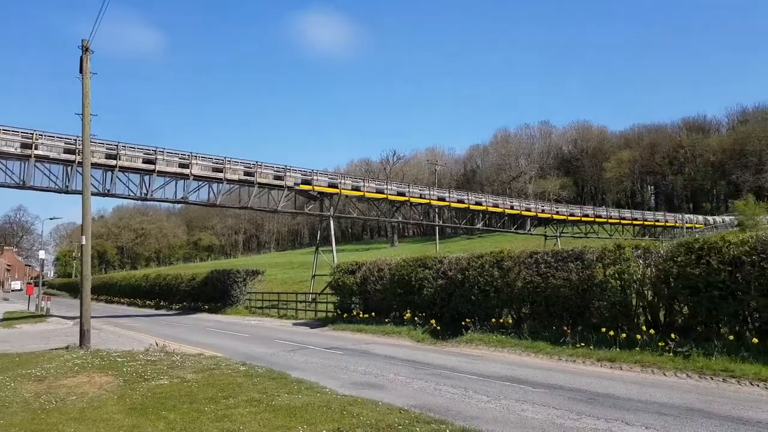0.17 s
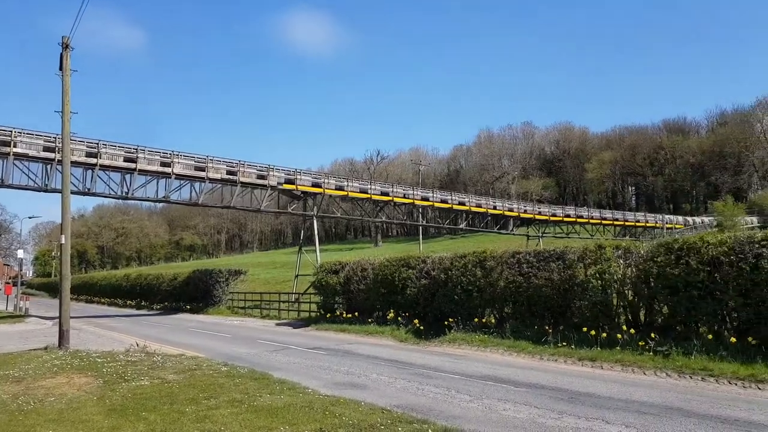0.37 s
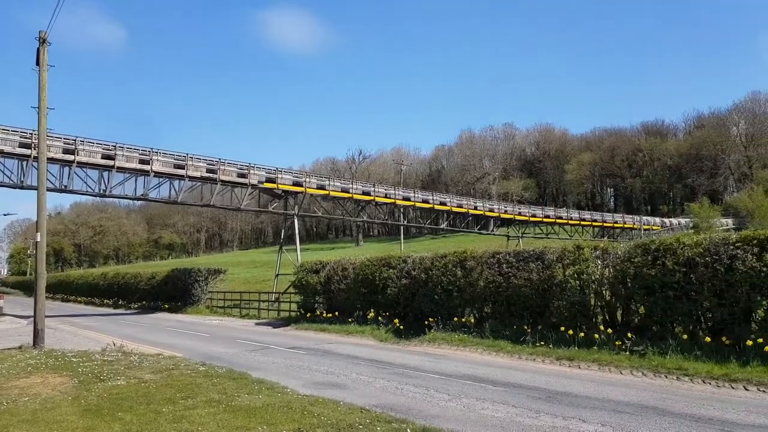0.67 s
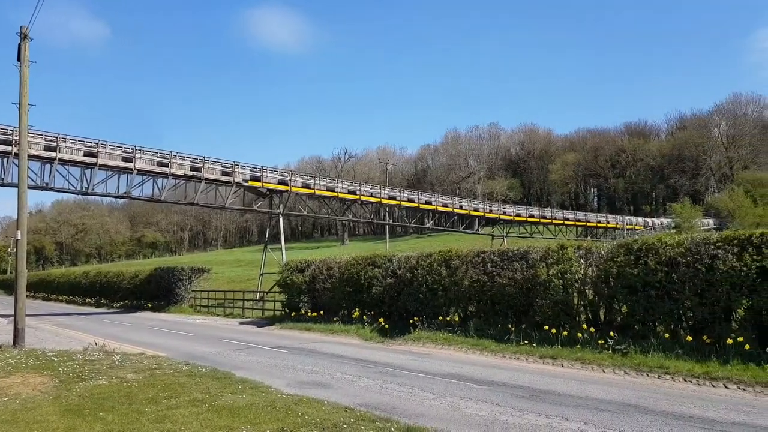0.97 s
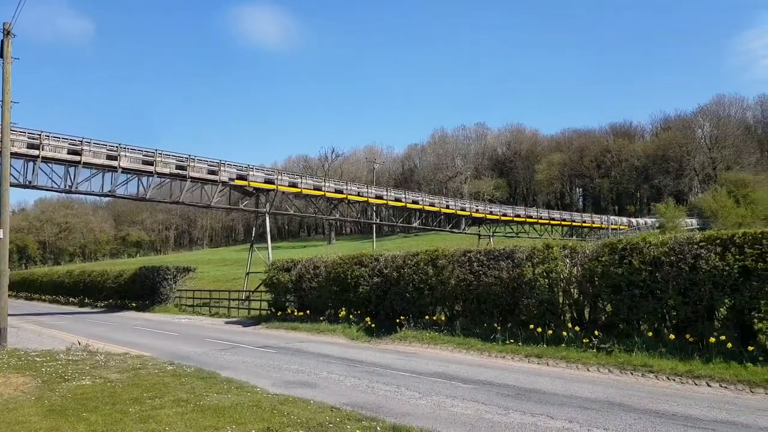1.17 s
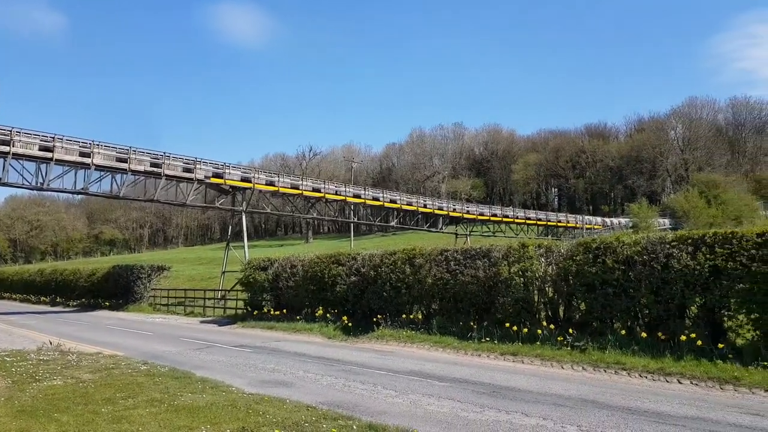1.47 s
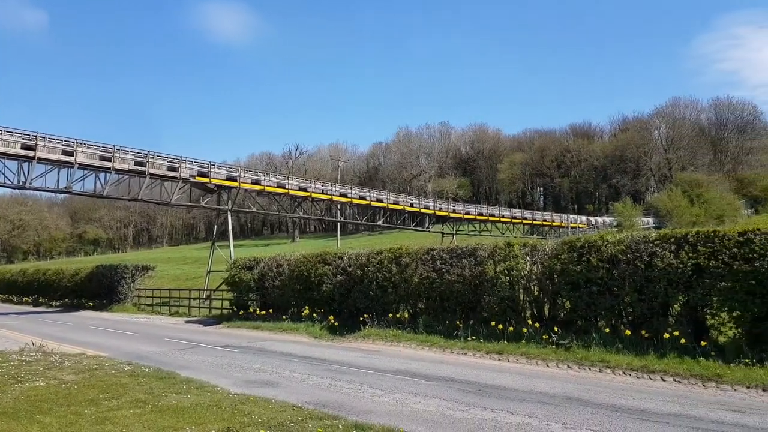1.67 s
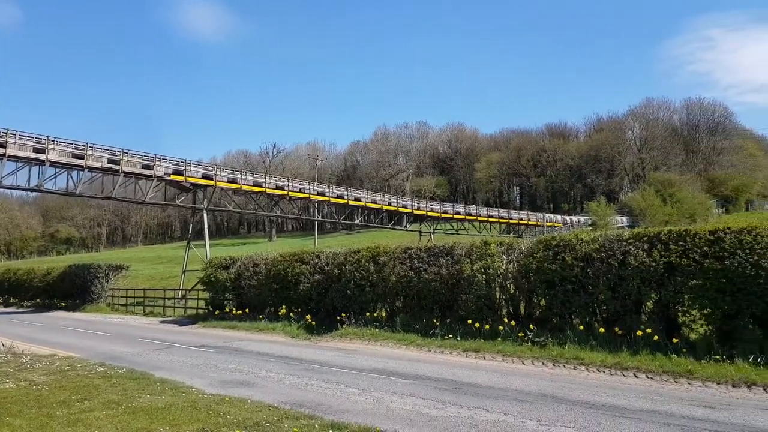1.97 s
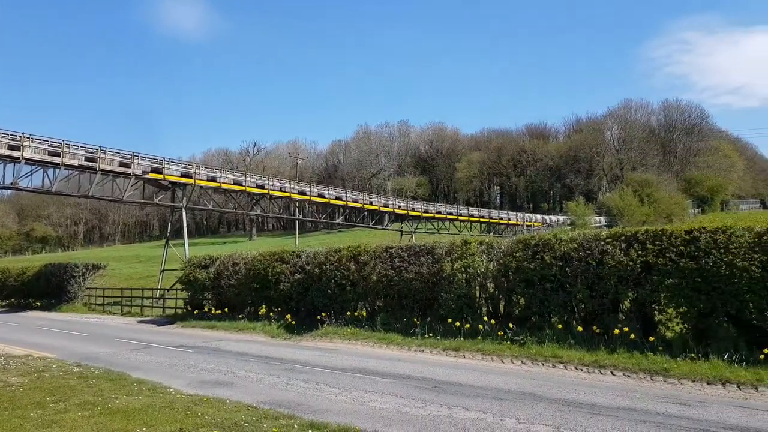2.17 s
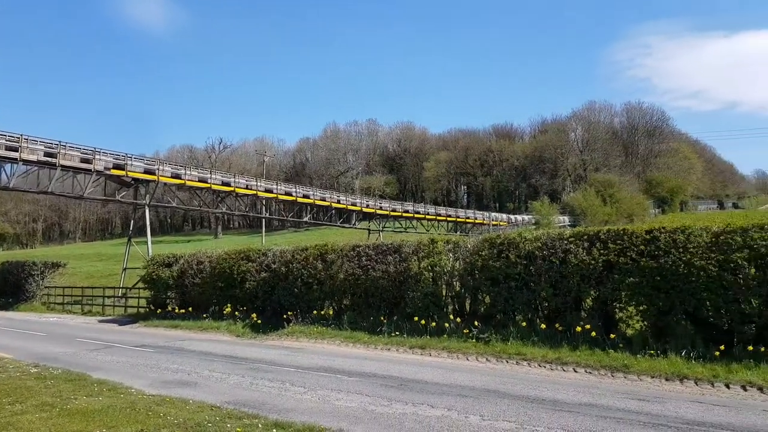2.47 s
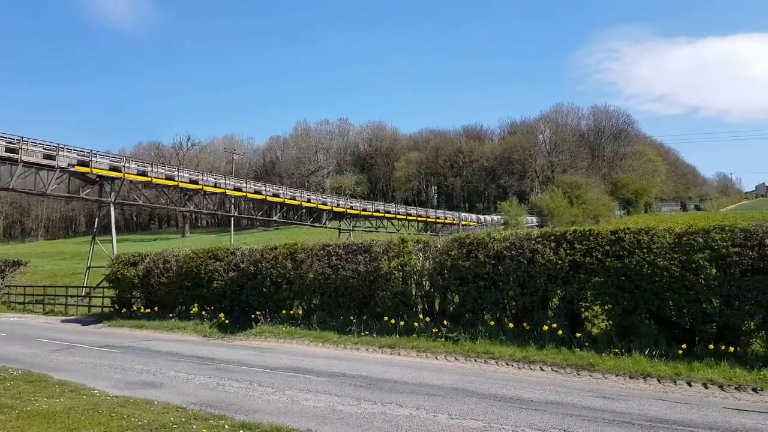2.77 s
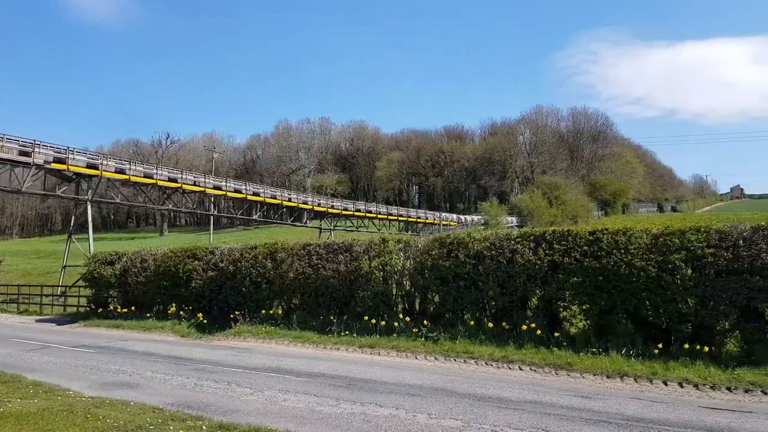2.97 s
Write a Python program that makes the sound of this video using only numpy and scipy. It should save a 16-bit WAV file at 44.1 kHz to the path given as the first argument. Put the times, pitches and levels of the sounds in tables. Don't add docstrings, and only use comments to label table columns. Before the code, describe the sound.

A long belt conveyor rumbles low and steady across open fields, with faint metallic rattles

```python
import sys
import numpy as np
from scipy import signal
from scipy.fft import rfft, irfft
from scipy.io import wavfile
from scipy.ndimage import uniform_filter1d, map_coordinates

SR = 44100
rng = np.random.default_rng(int(sys.argv[2]) if len(sys.argv) > 2 else 0)


def volts_from_decibels(level):
    exponent = np.asarray(level, float) / 20
    return 10 ** exponent


def to_wav(s):
    ch = np.atleast_2d(s).T
    pcm = np.round(np.clip(ch, -1, 1) * 32767)
    wavfile.write(sys.argv[1], SR, pcm.astype(np.int16))


N = 137151
T, HZ = np.arange(N) / SR, np.fft.rfftfreq(N, 1 / SR) + 1e-3

# f/Hz, density/dB per Hz
ROAR_SPECTRUM = [(20, -53), (43, -7.5), (55, -2.5), (110, -5), (250, -17), (900, -22), (2200, -38.5),
                 (6000, -62)]
# t/s, level/dB
BELT_LOAD = [
    (0, 1),
    (.4, 1),
    (.8, 0.5),
    (1.25, 1),
    (1.6, 0),
    (2.0, 1),
    (2.4, 0),
    (2.8, 0),
    (3.11, 0),
]
# f/Hz, width/Hz, level/dB
TRUSS_MODES = [(81.2, 26, -34.5), (133.6, 33, -40), (355.9, 46, -41), (436, 96, -37), (980, 180, -45),
               (517.3, 82, -49), (1387, 136, -51), (1887, 250, -54)]
# t/s, low tone level/dB, high tone level/dB
HUM_SWELL = [(0, -33.5, -27.5), (.2, -30, -29), (.45, -41, -40), (.8, -27, -25), (1.0, -29, -31),
             (1.2, -25, -33.5), (1.45, -31, -29), (1.6, -37, -29), (1.95, -35, -34.5), (2.3, -42, -40),
             (2.65, -49, -54), (2.9, -23.5, -26.5), (3.11, -31.5, -38)]
# f/Hz, level/dB, t60/s
STEEL_MODES = [(1855, -3, 0.01), (2434, -11, 0.02), (3085, -6.5, 0.011), (3600, -6, 0.025),
               (3850, -1, 0.013), (4200, -15, 0.0028), (4780, -20, .01), (5200, -14, 0.028),
               (5970, -22.5, 0.0018), (7660, -13.5, 0.0035), (8300, -19.5, .004), (8900, -27, .02),
               (9700, -19, 0.0032), (11000, -27, .002)]
# middle t/s, length/s, level/dB, brightness/dB per octave
RATTLE_BURSTS = [(0.04, 0.045, -70, 1), (0.073, 0.05, -54.5, -5), (0.143, 0.07, -53, -5),
                 (0.262, 0.019, -57, -5), (0.312, .04, -63, -6), (0.36, 0.079, -56.5, 2),
                 (0.459, 0.033, -54, 3.5), (0.517, 0.11, -57.5, -10), (0.566, 0.048, -48, 4),
                 (0.615, 0.037, -49, 2), (0.653, .02, -69, 9), (0.851, 0.053, -55, 0),
                 (0.911, 0.12, -52.5, 4.5), (0.972, 0.033, -49, 1), (1.024, 0.14, -57.5, 2),
                 (1.122, 0.098, -62, -1), (1.186, 0.052, -62, 0), (1.238, 0.066, -56, 4),
                 (1.303, 0.066, -64, 3), (1.373, 0.13, -57, 2), (1.439, 0.039, -49, -1.5),
                 (1.667, 0.025, -69, -5)]
# f/Hz, width/Hz, level/dB
SQUEAL_BANDS = [(3720, 280, -63), (3720, 300, -62), (3770, 260, -61), (3790, 340, -67), (3820, 320, -65),
                (4770, 150, -58), (3900, 200, -63), (1700, 250, -55)]
# start t/s, end t/s
SQUEAL_TIMES = [
    (-.1, .165),
    (.45, .56),
    (.82, 1.43),
    (1.5, 3.2),
    (2.05, 3.2),
    (.96, .985),
    (2.62, 2.7),
    (.95, 1.0),
]
# t/s, f/Hz, level/dB
BIRD_WHISTLE = [
    (1.79, 2290, -65),
    (1.83, 2335, -58),
    (1.87, 2460, -57),
    (1.91, 2525, -50.5),
    (1.95, 2430, -57),
    (1.98, 2390, -65),
]
# f/Hz, left minus right level/dB
PORT_SHADE = [(60, -8), (450, -7), (850, -4), (1200, -7.5), (2600, -1.5), (4200, 1), (5400, 5), (5900, 32)]
# f/Hz, phase/rad
PORT_LEAD = [(0, .25), (520, 1.5), (950, 2.2), (1810, 6.8), (2500, 8.1), (3100, 7.4), (3950, 9.3),
             (4250, 10.7), (5270, 11.7)]
# t/s, lag/s
PORT_TURN = [
    (0, -.00005),
    (.45, -.00001),
    (.9, 0),
    (1.4, .000016),
    (2.0, .00006),
    (2.4, .00008),
    (3.11, .00015),
]
# f/Hz, share common to both ports (0-1)
COMMON_SHARE = [(50, .78), (150, .94), (450, .985), (750, .62), (1000, .5), (1400, .68), (1900, .33),
                (3000, .2)]
# f/Hz, density/dB per Hz
LEFT_HISS = [(4000, -1), (5500, 20), (6800, -12), (8200, -7), (9000, 13), (12000, 19.5), (16000, 9)]
RIGHT_HISS = [(4000, -27), (6000, -42), (9950, -46), (10200, -14), (11500, 7), (13000, 4.5), (16000, 4)]

LOAD_FROM_HZ = 180


def set_level(x, db):
    return x * volts_from_decibels(db) / np.sqrt(np.mean(x ** 2))


def curve(table):
    hz, value = np.array(table).T
    return np.interp(np.log(HZ), np.log(hz), value)


def over_time(table):
    return np.interp(T, *np.array(table).T)


def shape(x, gain):
    ramp = np.linspace(x[..., 0], x[..., -1], N, axis=-1)
    mirrored = np.concatenate([x - ramp, (ramp - x)[..., ::-1]], axis=-1)
    filtered = irfft(rfft(mirrored) * np.repeat(gain, 2, axis=-1), 2 * N)[..., :N]
    return filtered + ramp * np.real(np.asarray(gain)[..., :1])


def ring(x, hz, width):
    return signal.lfilter(*signal.iirpeak(hz, hz / width, SR), x)


def ring_twice(x, hz, width):
    return ring(ring(x, hz, width), hz, width)


def walk(rate):
    hold = int(SR / rate)
    steps = np.repeat(rng.standard_normal(N // hold + 1), hold)
    return 1.355 * uniform_filter1d(uniform_filter1d(steps, hold), hold)[:N]


def load_db(hz):
    return over_time(BELT_LOAD) * (hz > LOAD_FROM_HZ)


def roar():
    spectrum = rfft(rng.standard_normal((3, N))) * volts_from_decibels(curve(ROAR_SPECTRUM))
    swell_db = 0.4 * walk(0.35)
    out = 0
    for hz in 22 * 2 ** np.arange(0, 9.6, .5):
        band = np.cos(np.pi * np.clip(np.log2(HZ / hz), -.5, .5))
        flicker_db = 0.5 * walk(8.6)
        out = out + irfft(spectrum * band, N) * volts_from_decibels(swell_db + flicker_db + load_db(hz))
    return set_level(out, -27.5)


def truss():
    out = 0
    for hz, width, db in TRUSS_MODES:
        shaken = ring_twice(rng.standard_normal((3, N)), hz, width)
        out = out + set_level(shaken, db) * volts_from_decibels(1.33 * walk(5.25) + load_db(hz))
    return out


def hum():
    times, *levels = np.array(HUM_SWELL).T
    out = 0
    for hz, db in zip((51.85, 79.55), levels):
        throb_db = 1.5 * walk(26)
        phase = 2 * np.pi * np.cumsum(hz * (1 + 0.01826 * walk(4.96))) / SR
        out = out + volts_from_decibels(np.interp(T, times, db) + throb_db) * np.sin(phase)
    return out


def rattle():
    knocks_per_s, spread_db = 2500, 1.5
    rise, fall = 0.25, 0.36
    struck = rng.random((len(STEEL_MODES), N)) < knocks_per_s / SR
    knocks = struck * rng.standard_normal(N) * volts_from_decibels(spread_db * rng.standard_normal(N))
    shakes = []
    for middle, length, _, _ in RATTLE_BURSTS:
        onset = np.exp(-.5 * ((T - middle) / (rise * length)) ** 2)
        tail = 1 / np.cosh(np.minimum((T - middle) / (fall * length), 30))
        shakes.append(np.where(T < middle, onset, tail))
    shakes = np.array(shakes)
    _, _, strength_db, tilt = np.array(RATTLE_BURSTS).T
    out = 0
    for blows, (hz, db, t60) in zip(knocks, STEEL_MODES):
        mode = set_level(ring(blows, hz, np.log(1000) / np.pi / t60), db)
        bursts = volts_from_decibels(strength_db + tilt * np.log2(hz / 3800)) @ shakes
        out = out + mode * bursts * volts_from_decibels(1.2 * walk(38.7))
    return out


def squeal():
    fade_s = .02
    out = 0
    for (start, end), (hz, width, db) in zip(SQUEAL_TIMES, SQUEAL_BANDS):
        band = set_level(ring_twice(rng.standard_normal(N), hz, width), db)
        gate = np.clip(np.minimum(T - start, end - T) / fade_s + .5, 0, 1)
        out = out + band * volts_from_decibels(2.2 * walk(29.94)) * gate
    return out


def whine():
    band = ring_twice(rng.standard_normal(N), 2490, 110)
    return set_level(band, -65) * volts_from_decibels(2.5 * walk(15.0))


def hedges(x):
    level_db, t60 = -9, .05
    t = np.arange(int(.08 * SR)) / SR
    tails = rng.standard_normal((2, len(t))) * np.exp(-np.log(1000) * t / t60)
    tails = tails / np.linalg.norm(tails, axis=1, keepdims=True)
    return volts_from_decibels(level_db) * signal.fftconvolve(x[None], tails, axes=1)[:, :N]


def bird():
    times, hz, db = np.array(BIRD_WHISTLE).T
    gate = np.clip(np.minimum(T - times[0], times[-1] - T) / 0.018, 0, 1)
    phase = 2 * np.pi * np.cumsum(np.interp(T, times, hz) * (1 + 0.0037 * walk(58.9))) / SR
    aside = .65 * np.array([[-1], [1]])
    return np.sqrt(2) * np.sin(phase + aside) * volts_from_decibels(np.interp(T, times, db) + 2.9 * walk(70)) * gate


def tick():
    envelope = np.exp(-np.abs(T - .33) / 0.0026)
    return volts_from_decibels(-46) * ring(rng.standard_normal(N), 13000, 6000) * envelope


def cavity_dip_db():
    return -21 * np.exp(-.5 * ((HZ - 7400) / 480) ** 2)


def hiss():
    colours = ((curve(LEFT_HISS) + cavity_dip_db(), -67.5), (curve(RIGHT_HISS), -63))
    return np.array([set_level(shape(rng.standard_normal(N), volts_from_decibels(colour_db) * (HZ > 3000)), db)
                     for colour_db, db in colours])


def scene():
    common, left, right = roar() + truss()
    share = np.clip(curve(COMMON_SHARE), 0, 1)
    steel = rattle() + squeal()
    turned = map_coordinates(steel, [(T - over_time(PORT_TURN)) * SR], mode="mirror")
    direct = shape(common, np.sqrt(share)) + hum() + bird() + whine() + np.array([steel, turned])
    diffuse = shape(np.array([left, right]), np.sqrt(1 - share)) + hedges(steel)
    lead = np.exp(.5j * np.interp(HZ, *np.array(PORT_LEAD).T))
    shade_db = curve(PORT_SHADE)
    ports = volts_from_decibels(np.minimum([shade_db, -shade_db], 0))
    heard = shape(direct, ports * [lead, 1 / lead]) + shape(diffuse, ports)
    return heard + tick() * np.array([[1], [0]])


def top_cut(x):
    return signal.sosfilt(signal.butter(12, 16340, fs=SR, output="sos"), x)


def record(dry):
    dipped = shape(dry, volts_from_decibels(0.6 * cavity_dip_db()))
    mix = shape(dipped + hiss(), HZ < 15550)
    return top_cut(mix)


dry = scene()
out = record(dry)
to_wav(out)
```